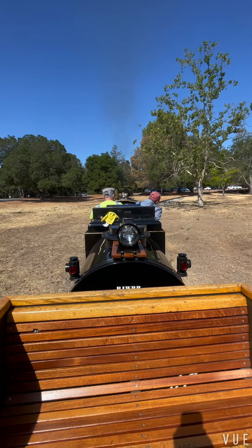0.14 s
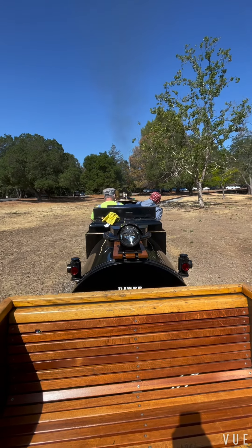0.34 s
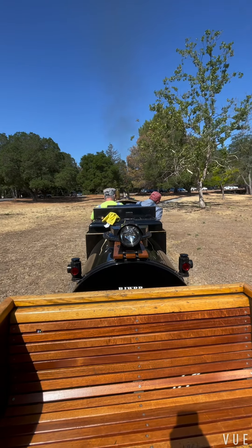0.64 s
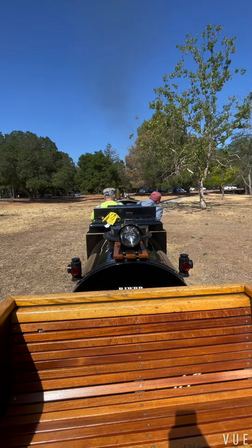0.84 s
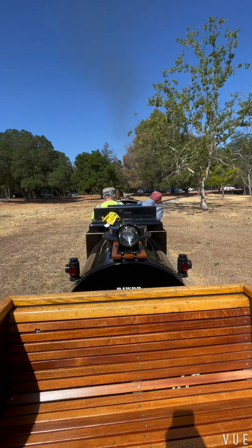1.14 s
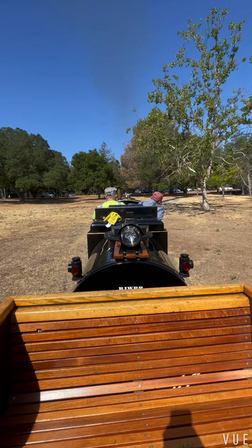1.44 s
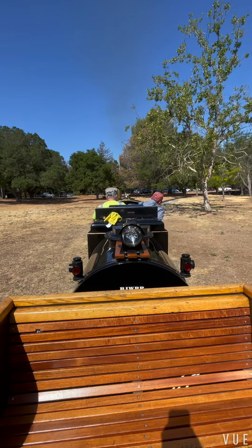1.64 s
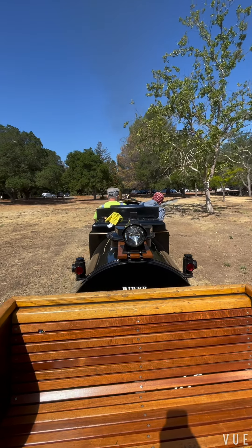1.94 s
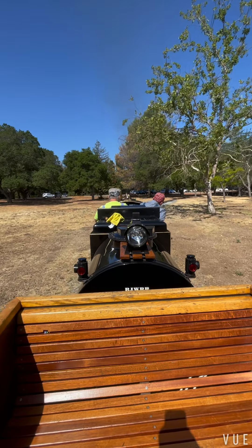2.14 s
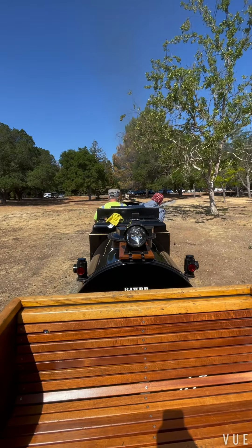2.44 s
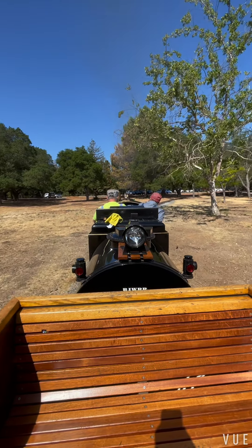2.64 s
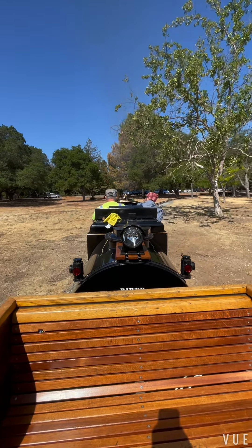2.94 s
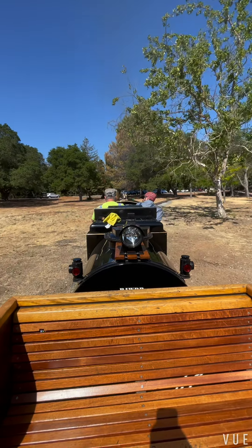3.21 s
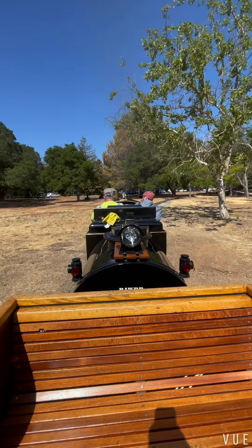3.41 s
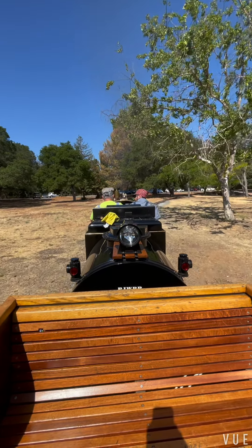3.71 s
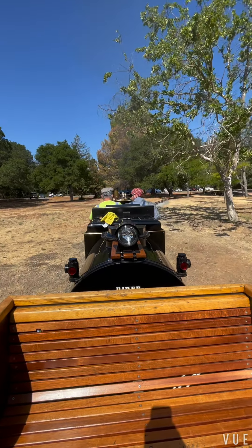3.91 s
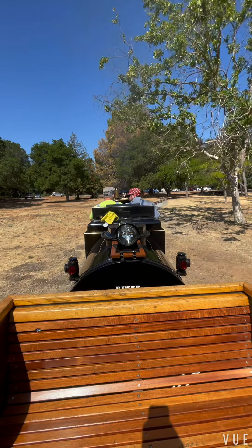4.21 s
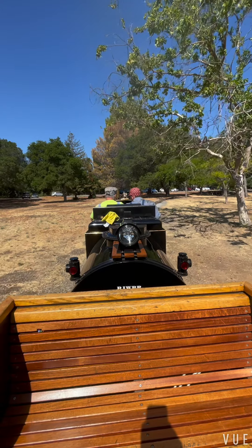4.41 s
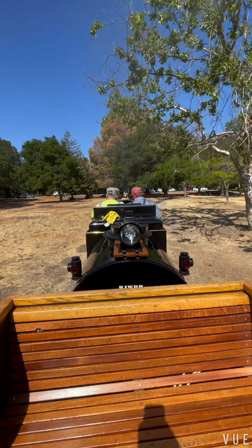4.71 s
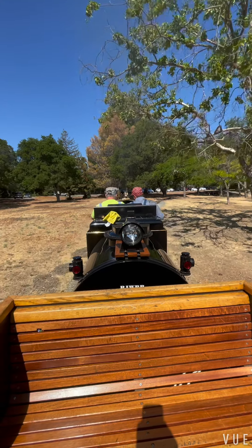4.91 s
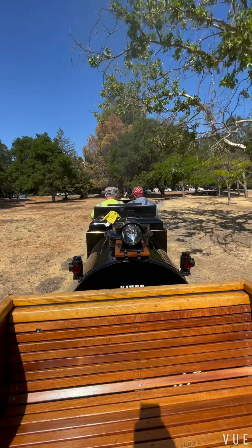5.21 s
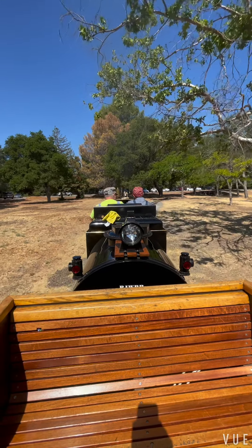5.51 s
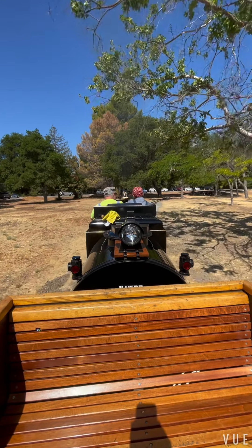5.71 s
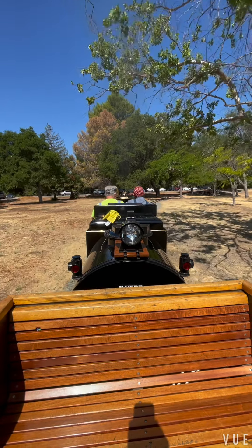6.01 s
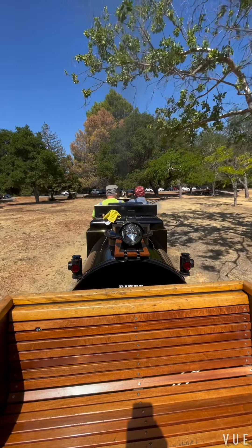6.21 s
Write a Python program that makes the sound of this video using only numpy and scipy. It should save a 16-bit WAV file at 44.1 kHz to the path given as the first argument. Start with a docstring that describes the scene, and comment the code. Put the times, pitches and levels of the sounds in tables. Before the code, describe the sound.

Fast, steady steam exhaust chuffs with hoarse barks and low thumps, slowly quickening above rail rumble, wooden car shake and occasional dull clanks.

```python
"""Wheels rumble and a wooden car shakes right behind a miniature steam locomotive in a park.
Over this, four times a wheel turn, about seven times a second and slowly quickening, comes an exhaust beat:
shaped noise hisses out of the blast pipe, roars and barks in the chimney; two short low swings thump.
The running gear clanks now and then: short bursts of noise through heavily damped resonances."""
import sys
import numpy as np
from scipy import signal
from scipy.fft import rfft, irfft
from scipy.io import wavfile
from scipy.ndimage import uniform_filter1d

SR = 44100
rng = np.random.default_rng(int(sys.argv[2]) if len(sys.argv) > 2 else 0)


def wav_record(signal):
    """Record a signal, one row per channel, as 16-bit PCM in the file named by sys.argv[1]."""
    frames = np.transpose(np.atleast_2d(signal))
    bounded = np.clip(frames, -1, 1)
    # unit amplitude maps onto the largest positive 16-bit level
    quanta = np.round(bounded * 32767).astype(np.int16)
    wavfile.write(sys.argv[1], SR, quanta)


N = 280035
TIME = np.arange(N) / SR  # s
FREQS = np.maximum(np.arange(N // 2 + 1) * SR / N, 1)  # Hz


def undb(db):
    """Decibels to gain."""
    return 10 ** (np.asarray(db) / 20)


def over_time(points, at):
    """Read a (time, value) curve at the given times."""
    return np.interp(at, *np.transpose(points))


def over_freq(points):
    """Join (frequency, value) points on a log-frequency axis."""
    hz, value = np.transpose(points)
    return np.interp(np.log(FREQS), np.log(hz), value)


def resonances(modes):
    """Gain of a set of steep-sided resonances whose powers add."""
    power = 0
    for hz, width, db in modes:
        detuning = (FREQS - hz) / width
        power = power + (undb(db) / (1 + 2 * detuning ** 2)) ** 2
    return np.sqrt(power)


def walk(rate):
    """Random levels held 1 / rate s, slewed twice and scaled to a standard deviation of 1."""
    hold = max(int(SR / rate), 2)
    steps = np.repeat(rng.standard_normal(N // hold + 1), hold)
    smooth = uniform_filter1d(uniform_filter1d(steps, hold), hold)[:N]
    return smooth / smooth.std()


def eddies(rate, depth_db):
    """Quick random swelling of a turbulent flow, with unit power."""
    swell = undb(depth_db * walk(rate))
    return swell / np.sqrt(np.mean(swell ** 2))


# level balance of the two microphone ports: (frequency [Hz], left minus right [dB])
BALANCE = [(61, -1.6), (121, -2.1), (222, -4.4), (562, -4.4), (682, -2.9), (792, 2.1), (902, 7.9),
           (1052, 3.1), (1332, 4.7), (1752, 0), (2202, 2.9), (3302, -2.1), (4402, 1), (5702, -5.4),
           (9002, -.6), (15002, 0.7)]
# phase between the ports: (frequency [Hz], lead of the left [rad])
PHASE = [(220, -.05), (480, .55), (770, 2.0), (980, 2.5), (1150, 5.7), (1900, 6.35), (5400, 6.6),
         (6600, 7.9), (8400, 9.25), (9400, 8.85), (10100, 9.35), (11000, 9.45), (14500, 12.5)]
# how alike the ports sound: (frequency [Hz], likeness [0-1])
LIKENESS = [(102, 0.97), (202, 0.73), (402, 0.64), (622, 1), (802, 1), (1022, 0.46), (1802, 0.98),
            (2502, 0.75), (3002, 0.1), (5202, 0.24), (7002, 0.58), (9302, 0.82), (10202, 1), (15900, 0.97)]


def air_noise(gain, flutter=1):
    """Fluttering noise of a given density per Hz, as it reaches the left and right port."""
    white = rng.standard_normal((2, N)) * flutter
    common, apart = rfft(white) * gain * np.sqrt(SR / 2)
    like = np.clip(over_freq(LIKENESS), 0, 1)
    sign = np.array([[1], [-1]])  # left, right
    ports = np.sqrt((1 + like) / 2) * common + sign * np.sqrt((1 - like) / 2) * apart
    shade = undb(sign * over_freq(BALANCE) / 2)
    shade = shade / np.sqrt(np.mean(shade ** 2, axis=0))  # keep the mean power of the pair
    turn = np.exp(1j * sign * over_freq(PHASE) / 2)
    return irfft(ports * shade * turn, N)


# wheels on rails and the shaking car: (frequency [Hz], relative density [dB per Hz])
RUMBLE = [(15, -72), (26, -60), (45, -43.5), (80, -34), (118, -39), (160, -51), (200, -49.5), (260, -53),
          (500, -59.5), (1000, -70), (1200, -72), (4000, -80.5), (9000, -81), (16000, -89.5)]
# resonances of wheels and frame: (frequency [Hz], width [Hz], relative density [dB per Hz])
WHEEL_MODES = [(416, 55, -65.5), (623, 24, -55.5), (745, 51, -54), (976, 82, -59.5), (6130, 440, -81),
               (9330, 145, -76.5)]


def rolling():
    """The wheels rumble unevenly and the roughness of the rails keeps the frame ringing."""
    rumble = air_noise(undb(over_freq(RUMBLE)), eddies(42, 1.82))
    ringing = air_noise(resonances(WHEEL_MODES), eddies(21.02, 2.4))
    rail_roughness = undb(.6 * walk(4))
    return (undb(-1.13) * rumble + undb(0.3) * ringing) * rail_roughness


# the four exhaust beats of one turn of the driving wheels, unequal as the valves are set:
# (lateness [s], relative chimney bark [dB], jet [dB], nozzle hiss [dB], thump [dB],
#  time from thump to rebound before jitter [s])
TURN_BEATS = [(-.002, -0.04, -.5, 0.5, -1.2, .024), (-.002, -0.35, -0.23, 0, -0.3, 0.03305),
              (.0014, 0, 0, -.5, -0.5, .032), (.0044, 1.2, 0.8, 1, 0, 0.0329)]
FIRST_BEAT_S, BEAT_GAP_S, GAP_SHRINK_S = .068, .14792, .000153


def beats(count=44):
    """Beat times, with gaps shrinking as the engine gathers speed, and each beat's traits."""
    number = np.arange(count)
    late, *traits = np.array(TURN_BEATS)[number % len(TURN_BEATS)].T
    gaps = BEAT_GAP_S - GAP_SHRINK_S * number
    return FIRST_BEAT_S + np.cumsum(gaps) - gaps + late, *traits


def blasts(times, levels_db, lead, rise, decay):
    """Steam flow: at each beat the valve opens smoothly, then the cylinder empties; times in s."""
    power = np.zeros(N)
    for at, db in zip(times, levels_db):
        span = slice(max(int((at - lead) * SR), 0), int((at + .5) * SR))
        age = TIME[span] - at + lead
        opening = np.sin(np.pi / 2 * np.clip(age / rise, 0, 1))
        emptying = np.exp(-np.maximum(age - rise, 0) / decay)
        power[span] += (undb(db) * opening * emptying) ** 2
    return np.sqrt(power)


# the hiss of the blast nozzle as the valve opens: (frequency [Hz], relative density [dB per Hz])
NOZZLE_SPECTRUM = [(3000, -96), (4700, -100), (5500, -66.5), (6300, -64), (7700, -68), (8700, -81),
                   (16000, -77.5)]
# swells and dips of the nozzle hiss: (time [s], relative level [dB])
HISS_LEVEL = [(0, 1.5), (.65, 4.5), (.82, -1.5), (1.4, 2.3), (2, -1), (2.4, 1.5), (3.25, -2), (3.6, 1),
              (4.2, -5.5), (4.78, -13), (5.14, 3), (5.32, -4.5), (6, -10), (6.3, .5)]
# the turbulent steam jet: (frequency [Hz], relative density [dB per Hz])
JET_SPECTRUM = [(62, -52), (182, -43), (292, -46), (422, -52), (905, -53), (1155, -58), (1405, -56),
                (2005, -58.5), (2605, -62), (3305, -68), (4405, -67.5), (9505, -68.5), (11005, -69),
                (15900, -78)]
# how hard the engine works, heard in the jet: (time [s], relative level [dB])
ENGINE_EFFORT = [(0, -1.1), (1.9, -0.9), (2.27, .4), (2.7, -0.2), (3.65, -1.4), (4.55, .4), (5.3, 0),
                 (5.7, 1), (6.3, 0.4)]
# chimney resonances: (frequency [Hz], width [Hz], relative density [dB per Hz])
CHIMNEY_MODES = [(557, 150, -46), (639, 34.3, -39), (775, 51, -40.5), (897, 144, -46.5)]
BARK_SCATTER_DB = 0.6


def exhaust():
    """Steam noise per beat: the nozzle hiss peaks first, the jet last; the chimney bark decays slowest."""
    times, bark_db, jet_db, hiss_db, *_ = beats()
    bark_db = bark_db + BARK_SCATTER_DB * rng.standard_normal(len(times))
    jet_db = jet_db + over_time(ENGINE_EFFORT, times)
    hiss_db = hiss_db + over_time(HISS_LEVEL, times)

    nozzle = air_noise(undb(over_freq(NOZZLE_SPECTRUM)), eddies(240, 1.5))
    nozzle = nozzle * blasts(times, hiss_db, lead=0.0072, rise=0.026, decay=0.038)

    flow = blasts(times, jet_db, lead=0.0067, rise=0.041, decay=0.02)
    # the jet surges once more as the gas column in the chimney swings back
    surge = np.interp(TIME - .033, TIME, flow, left=0)
    flow = np.hypot(flow, undb(-10.5) * surge)
    # big slow eddies roughen the roar; the small ones that make the treble stay more even
    roar_share = 1 / (1 + (FREQS / 3000) ** 4)
    density = undb(over_freq(JET_SPECTRUM))
    roar = air_noise(density * np.sqrt(roar_share), eddies(220, 1.78))
    spray = air_noise(density * np.sqrt(1 - roar_share), eddies(350, 0.95))
    jet = (undb(-0.44) * roar + undb(-0.47) * spray) * flow

    bark = air_noise(resonances(CHIMNEY_MODES))
    bark = bark * blasts(times, bark_db, lead=0.0089, rise=0.032, decay=0.048)
    return undb(-1.1) * nozzle + jet + undb(-0.58) * bark


def swing(at, hz, length):
    """A short swing of air pressure that swells and dies within a few cycles."""
    out = np.zeros(N)
    span = slice(max(int((at - 5 * length) * SR), 0), int((at + 5 * length) * SR))
    age = TIME[span] - at
    out[span] = np.cos(2 * np.pi * hz * age) * np.exp(-.5 * (age / length) ** 2)
    return out


# the thump, before accent and scatter: (time [s], relative level [dB])
THUMP_LEVEL = [(.07, -7), (.4, -13), (.66, -4), (1.1, -6), (1.55, -2.5), (2.7, -6), (3.1, -2.5), (4, -3.5),
               (4.5, -6.5), (4.8, -3.5), (5.3, -6), (6.2, -3.5)]
# the rebound that follows the thump, before scatter: (time [s], relative level [dB])
REBOUND_LEVEL = [(.07, -11), (.35, -4.5), (1.2, -7), (1.7, -13.5), (2.15, -7.5), (2.85, -6.5), (3.1, -14),
                 (3.7, -17), (3.88, -9), (5.15, -4), (5.45, -10), (6.3, -6)]
THUMP_DELAY_S, THUMP_JITTER_S, REBOUND_JITTER_S = .038, 0.0019, .0025
THUMP_SCATTER_DB, REBOUND_SCATTER_DB = 1.5, 2


def thumps():
    """Each slug of gas thumps out of the chimney, its column rebounds; a slower swing lies under both."""
    out = np.zeros(N)
    for at, *_, accent_db, rebound_s in zip(*beats()):
        pitch, timing, size = rng.standard_normal((3, 2))  # each for thump and rebound
        thump_at = at + THUMP_DELAY_S + THUMP_JITTER_S * timing[0]
        rebound_at = thump_at + rebound_s + REBOUND_JITTER_S * timing[1]
        thump_db = over_time(THUMP_LEVEL, at) + accent_db + THUMP_SCATTER_DB * size[0]
        rebound_db = over_time(REBOUND_LEVEL, at) + REBOUND_SCATTER_DB * size[1]
        out += undb(thump_db) * swing(thump_at, 94 * (1 + .04 * pitch[0]), length=0.0067)
        out += undb(rebound_db) * swing(rebound_at, 91 * (1 + .04 * pitch[1]), length=.0091)
        out += undb(thump_db - 16) * swing(thump_at + 0.022, 38, length=0.022)
    return out * undb(np.array([[-.85], [.85]]))  # a little stronger on the right


# knocks of the running gear: (time [s], relative level [dB])
KNOCKS = [(0.2975, -21), (0.601, -17.5), (1.4975, -27), (3.6765, -23), (3.9785, -28.5), (4.5085, -26),
          (5.3844, -36)]
# heavily damped resonances of the gear: (frequency [Hz], width [Hz], relative level [dB])
GEAR_MODES = [(425, 200, 9), (910, 400, 5.5), (1450, 350, -10), (1910, 470, -11), (2750, 1100, -15),
              (5000, 2500, -19)]


def clanks():
    """Slack in the running gear gives short dull knocks of resonant noise; rattles come at random."""
    rattles = [(u * N / SR, -36 + 8 * v) for u, v in rng.random(size=(24, 2))]
    contact = np.zeros(N + SR)
    age = TIME[:SR // 10]
    knock = np.minimum(age / 0.0028, 1) * np.exp(-age / 0.013)
    for at, db in list(KNOCKS) + rattles:
        start = int(at * SR)
        contact[start:start + len(age)] += undb(db) * knock
    steel = air_noise(resonances(GEAR_MODES))
    return undb(3) * contact[:N] * steel / steel.std()


def scene():
    """Car and engine, in the open air."""
    return rolling() + exhaust() + thumps() + clanks()


TOP_HZ = 15750


def record(dry):
    """The phone rounds the highest peaks and cuts the top."""
    rounded = dry / (1 + dry ** 8) ** (1 / 8)
    top_cut = signal.ellip(12, .1, 90, TOP_HZ, fs=SR, output="sos")
    return signal.sosfilt(top_cut, rounded)


dry = scene()
out = record(dry)
wav_record(out)
```